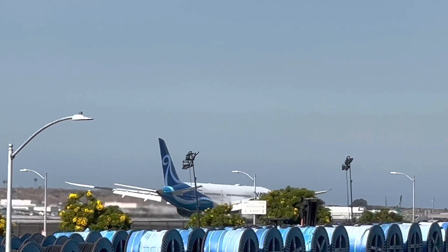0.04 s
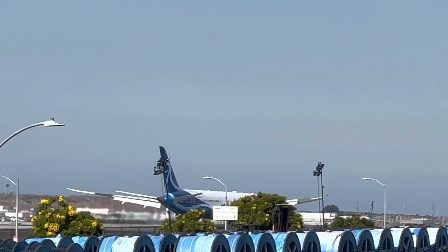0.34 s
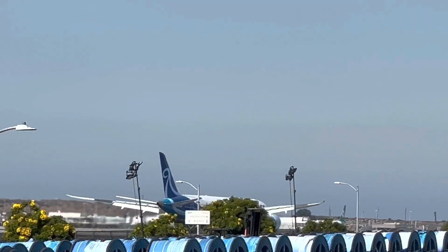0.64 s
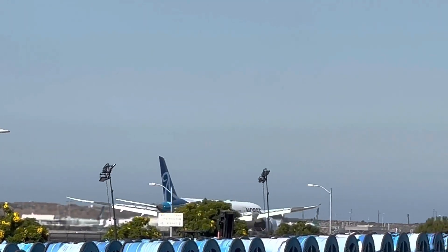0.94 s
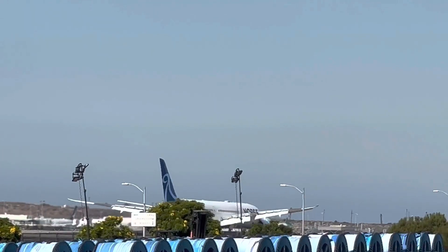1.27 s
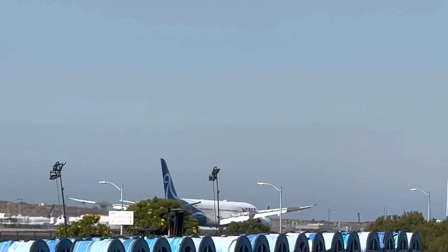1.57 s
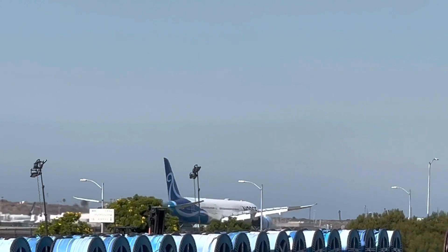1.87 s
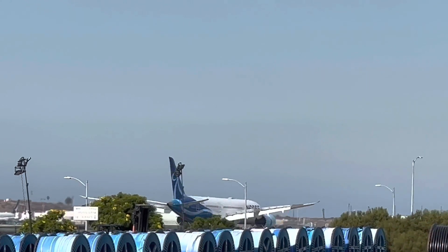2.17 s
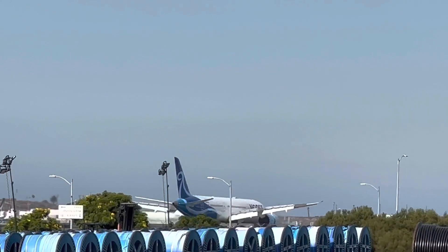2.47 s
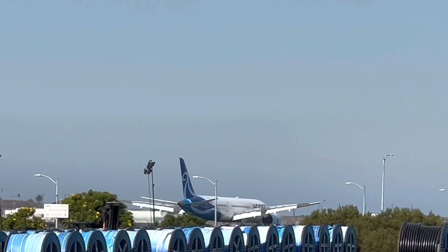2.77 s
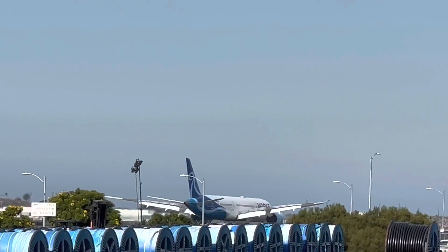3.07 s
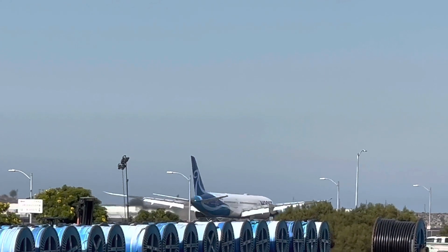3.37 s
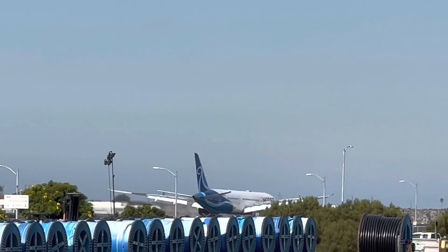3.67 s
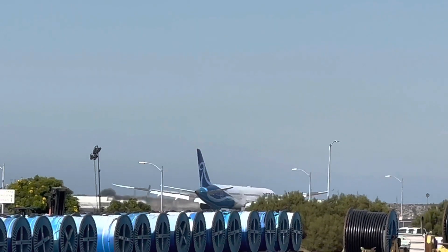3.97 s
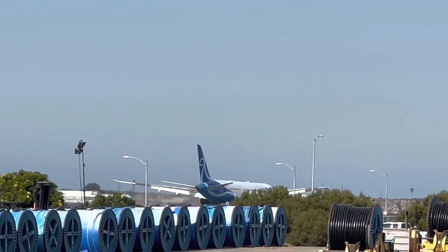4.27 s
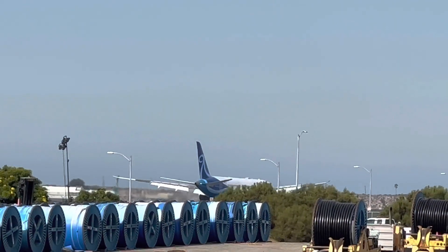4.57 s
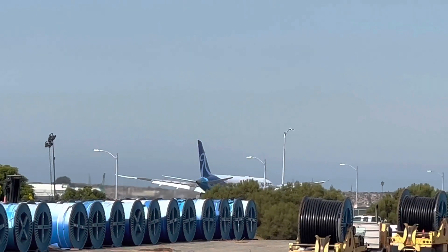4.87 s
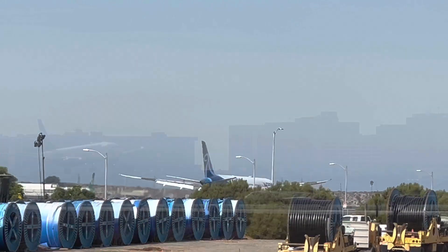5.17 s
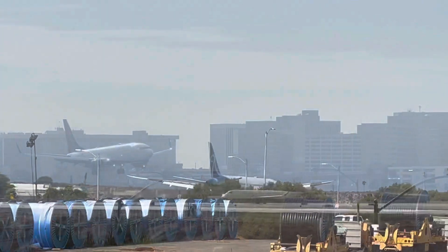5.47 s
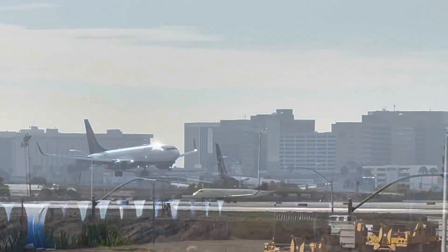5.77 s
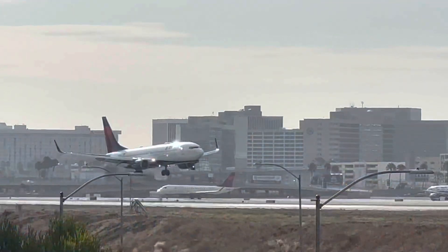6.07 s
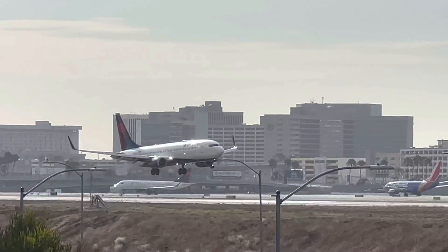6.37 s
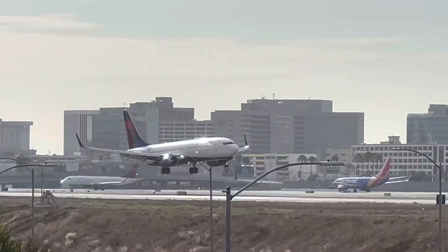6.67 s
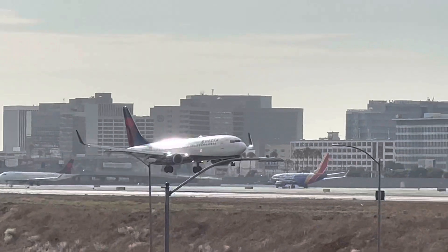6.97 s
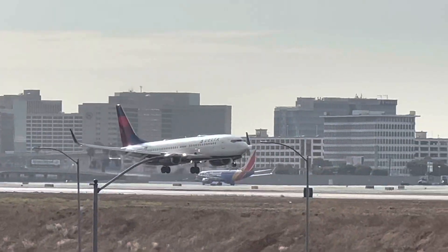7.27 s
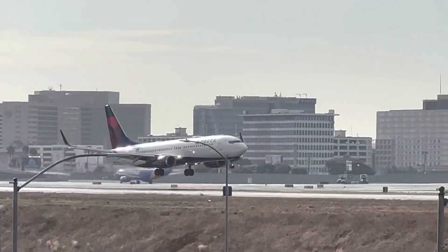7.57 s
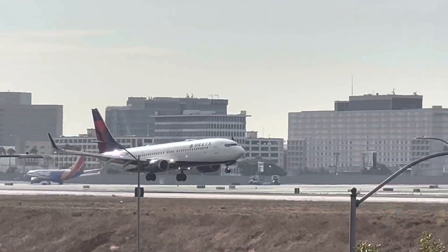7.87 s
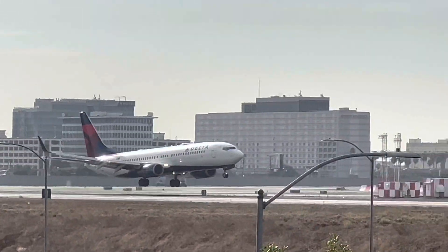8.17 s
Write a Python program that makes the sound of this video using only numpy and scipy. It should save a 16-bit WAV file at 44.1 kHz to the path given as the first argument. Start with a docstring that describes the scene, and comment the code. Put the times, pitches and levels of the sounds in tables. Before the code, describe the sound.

From the start, an airliner slows on a distant runway with a broad, steady roar, light hiss and deep rumble. A hollow, mid-pitched howl wavers in and out, strongest around 2.8 seconds. The rumble surges unevenly near 1.4 seconds, between 2.5 and 3.5, and again from 4.5 to 5.

Between about 5.2 and 6 seconds, this blends smoothly into a second jet gliding in to land. Its high, fluttering whine sinks in pitch, more quickly as it draws level. Its roar and hiss build from about 7.5 seconds until the sound ends at roughly 8.4. A thin, faint whistle of nearly steady pitch swells and fades alongside this second plane.

Close to the outdoor microphone, something dry rustles very softly, most noticeably around 2.5 to 4 seconds, with a few tiny ticks just after 6 seconds.

```python
"""A surging rumble, a broad roar and a hollow howl: an airliner rolls out on a distant runway, its
reverse thrust shedding turbulent eddies, the large ones rumbling and the small ones hissing.
The scene dissolves to a second jet gliding in to land, its fan and turbine whine sinking by the
Doppler effect as it draws level, while a thin whistle stands over the airfield. The echo from a
nearby hard surface comb-filters both jets, and something dry rustles close by."""
import sys
import numpy as np
from scipy import signal
from scipy.fft import rfft, irfft
from scipy.io import wavfile
from scipy.ndimage import uniform_filter1d

SR = 44100
rng = np.random.default_rng(int(sys.argv[2]) if len(sys.argv) > 2 else 0)


def inscribe(sig):
    """Save sig as 16-bit PCM at rate SR to the path in sys.argv[1].

    A 1-D sig is mono; a 2-D sig holds one channel per row.
    Samples are clipped to [-1, 1] before scaling.
    """
    pcm = np.round(np.clip(np.atleast_2d(sig).T, -1, 1) * 32767)
    wavfile.write(sys.argv[1], SR, pcm.astype(np.int16))


N = 371322
TIME = np.arange(N) / SR
FREQ = np.maximum(np.arange(N // 2 + 1) * SR / N, 1)


# Strength of the reverse thrust. Each row: time in seconds, relative level in dB.
THRUST = [(0, -28.5), (0.4, -29), (0.65, -30.5), (1.3, -30.5), (1.7, -32.5), (2.2, -31.5), (2.7, -29.0),
          (3.05, -30.0), (4.0, -31.0), (4.7, -31), (5.2, -32.5), (5.6, -32)]
# Spectrum of its roar and hiss. Each row: frequency in Hz, relative density in dB.
THRUST_SPECTRUM = [(400, -7), (700, 0.5), (850, -5), (1100, -3.5), (1550, -6.5), (2300, -13.5), (3000, -17),
                   (4000, -26.5), (5000, -34.5), (6300, -43.5), (8000, -52.5), (9500, -58)]

def rolling_jet():
    """Turbulent mixing: reversed fan air and exhaust roar; air absorbs the hiss as the jet recedes."""
    thrust_db, = curves(THRUST)
    spectrum = colour(THRUST_SPECTRUM)
    absorbed_db = 1.03 * TIME
    roar = lean(spread(spectrum * band(370, 3770), -19.5), right_db=.13)
    roar *= undb(thrust_db + 1.86 + .56 * walk(23))
    hiss = spread(spectrum * band(3190, 6350), -31)
    hiss *= undb(thrust_db - 12.5 - absorbed_db + .17 * walk(12))
    direct = exhaust_rumble() + roar + hiss + reverser_howl(thrust_db)
    return reflect(direct, left_share=.12, right_share=.3)


# Bass spectrum of the rolling jet. Each row: frequency in Hz, relative density in dB.
EXHAUST_SPECTRUM = [(10, -56.5), (20, -28.5), (30, -13), (42, -1.5), (54, 1.5), (75, -4), (96, -6),
                    (120, -10), (170, -10.5), (205, -12.5), (285, -10.5), (380, -13.5), (550, -15)]
# Slow course of its deep rumble and of its upper-bass boom. Each row: time in seconds, level in dB.
RUMBLE_LEVEL = [(0, -31.5), (0.55, -31), (1.4, -29.3), (2.05, -31.8), (2.65, -30.5), (3.2, -30),
                (3.8, -28.5), (4.6, -29.5), (5.3, -31.5)]
BOOM_LEVEL = [(0, -36), (0.5, -33.5), (1.1, -35.5), (1.38, -30.5), (1.85, -35.5), (3.1, -33.5), (3.9, -36),
              (5.1, -34.5), (5.5, -36)]

def exhaust_rumble():
    """Large eddies radiate low frequencies: a surging rumble and a boom under a nearly steady body."""
    rumble_db, = curves(RUMBLE_LEVEL)
    boom_db, = curves(BOOM_LEVEL)
    spectrum = colour(EXHAUST_SPECTRUM)
    rumble = spread(spectrum * band(26, 94), -27.5) * undb(rumble_db + eddy_surges(chance_db=.8))
    boom = spread(spectrum * band(94.5, 200), -20.5) * undb(boom_db)
    body = spread(spectrum * band(176, 510), -22.5) * undb(-31 + .5 * walk(7))
    return rumble + boom + body


# The strongest surges and lulls of both jets' rumble. Each row: centre in seconds, lift in dB.
EDDY_SURGES = [(1.3, 1.5), (1.46, 3), (2.46, 5.5), (2.67, 6), (2.81, 5.2), (3.14, 5.5), (3.48, 4),
               (3.68, -4), (4.48, 5), (4.76, 6), (4.95, 4.2), (5.33, 3), (6.36, 4), (6.47, -7), (7.63, 4),
               (7.8, -3.5)]

def eddy_surges(chance_db, width_s=.05):
    """Intermittency: the rumble's lift in dB as large eddies pass, with smaller random surges on top."""
    strongest_db = sum(db * np.exp(-((TIME - s) / width_s) ** 2) for s, db in EDDY_SURGES)
    return strongest_db + chance_db * walk(6)


# Howl of the reversers. Each row: time in seconds, pitch in Hz, relative level in dB.
REVERSER_HOWL = [(0, 654, -56), (0.35, 631, -33), (0.58, 633, -42), (0.66, 623, -26), (0.74, 640, -39),
                 (0.95, 632, -43), (1.1, 632, -34), (1.3, 642, -31), (1.42, 629, -30.5), (1.5, 626, -48.5),
                 (1.68, 622, -34), (2.0, 632, -45), (2.2, 628, -38), (2.62, 638.5, -43), (2.81, 640, -24),
                 (2.94, 638, -43), (3.1, 634, -33), (3.27, 636, -36.5), (3.52, 643, -30.5),
                 (3.64, 643, -46), (3.95, 647, -36), (4.25, 637, -33), (4.4, 635, -35), (4.56, 644.5, -30),
                 (4.72, 637, -42), (5.4, 634, -40)]

def reverser_howl(thrust_db, waver_hz=3):
    """Frequency modulation: turbulent flow shakes the howl, a narrow core on a wider skirt of noise."""
    hz, howl_db = curves(REVERSER_HOWL)
    hz = hz + waver_hz * walk(8.3)
    core = even(tone(hz, smear_hz=12), .038) * undb(howl_db - 2 + .98 * walk(42))
    skirt = tone(hz, smear_hz=34) * undb(thrust_db - 19.5)
    return core + skirt


# Spectrum of the landing jet's roar and hiss. Each row: frequency in Hz, relative density in dB.
GLIDE_SPECTRUM = [(400, -2.5), (700, 2.5), (850, 1.5), (1100, -0.5), (1550, -4), (2300, -7.5), (3000, -11),
                  (3800, -18.5), (4400, -21.5), (5100, -26), (6300, -32.5), (7300, -37.5), (8000, -46.5),
                  (9500, -65)]
# Broad peaks of its engines' blare. Each row: centre in Hz, width in Hz, relative height in dB.
BLARE_RESONANCES = [(1175, 260, 3), (1570, 290, -1)]
# Its treble wavers on the way through the air. Each row: time in seconds, gain in dB.
TREBLE_WAVER = [(5.8, 0), (6.15, 0.5), (6.55, -2), (6.78, 0), (7.1, -1), (7.5, 0), (8.0, -1.5),
                (8.42, -2.5)]

def landing_jet(speed_m_s=72, distance_m=72, abeam_s=8.27):
    """Directivity: noise of near-idle engines and air over the flaps grows as the jet turns side-on."""
    bearing = np.arctan2(distance_m, speed_m_s * (abeam_s - TIME))  # straight flight path
    nose_deg = np.degrees(bearing)
    ahead_deg = 90 - nose_deg
    exhaust_db = 7.5 * beam(nose_deg, aim_deg=107, width_deg=11.2)  # the exhaust comes into view
    treble_db, = curves(TREBLE_WAVER)
    spectrum = colour(GLIDE_SPECTRUM)
    roar = spread(spectrum * band(410, 3500), -9)
    roar *= undb(-36.5 - .05 * ahead_deg + exhaust_db + .46 * walk(12))
    blare = spread(peaks(BLARE_RESONANCES), -26) * undb(-39)
    blare *= beam(nose_deg, aim_deg=93.6, width_deg=17)
    hiss = spread(spectrum * band(3350, 7400), -34)
    hiss *= undb(-48 - .13 * ahead_deg + exhaust_db + .5 * walk(13))
    air = spread(spectrum * band(7100, 8400), -27.5) * undb(-83 + .8 * walk(12))
    lower = lean(glide_rumble() + roar + blare, right_db=.45)
    treble = (hiss + air) * undb(treble_db)
    return reflect(lower + treble + blade_whine(bearing, speed_m_s), left_share=-.02, right_share=.2)


# Bass spectrum of the landing jet. Each row: frequency in Hz, relative density in dB.
GLIDE_BASS_SPECTRUM = [(10, -54), (20, -25.5), (30, -16.5), (42, -14), (55, 0.5), (75, -4), (95, -6),
                       (160, -11.5), (205, -18), (260, -18), (380, -22), (460, -19), (550, -21.5)]
# Slow course of its rumble. Each row: time in seconds, level in dB.
GLIDE_RUMBLE_LEVEL = [(5.3, -28), (5.9, -31.5), (6.8, -29.5), (7.3, -31), (7.75, -32.5), (8.4, -29)]

def glide_rumble():
    """Large-scale turbulence: the landing jet's bass surges beneath a nearly steady body."""
    rumble_db, = curves(GLIDE_RUMBLE_LEVEL)
    spectrum = colour(GLIDE_BASS_SPECTRUM)
    rumble = spread(spectrum * band(25, 114), -14) * undb(rumble_db + eddy_surges(chance_db=.5))
    body = spread(spectrum * band(114.6, 480), -13) * undb(-36 + .7 * walk(6))
    return rumble + body


# Beamed tones of the fan, other blade rows and shaft orders. Each row: multiple of the fan tone,
# aim in degrees from the nose, half width in degrees, level on the beam's axis in dB.
BLADE_TONES = [(0.97, 52, 11, -55.5), (1.36, 79, 6, -59), (1.48, 55, 4, -62.5), (2, 35, 9, -74),
               (2, 53, 9, -64.5), (2, 66, 11, -66), (2, 94, 14, -69.5), (2.495, 53, 13, -76),
               (2.54, 94, 16, -68), (3.01, 101, 22, -72)]

def blade_whine(bearing, speed_m_s, fan_hz=2455, smear_hz=42, flutter_db=2.2):
    """Doppler effect: the tones sink as the jet draws level; moving air bends, smears and flutters them."""
    heard_hz = fan_hz / (1 - speed_m_s / 343 * np.cos(bearing))
    heard_hz *= 1 + .003 * walk(10)
    whine = np.zeros(N)
    for multiple, aim_deg, width_deg, db in BLADE_TONES:
        line = even(tone(multiple * heard_hz, multiple * smear_hz), .05)
        whine += line * beam(np.degrees(bearing), aim_deg, width_deg) * undb(db + flutter_db * walk(24))
    return whine


# The whistle over the airfield. Each row: time in seconds, pitch in Hz, level in dB.
AIRFIELD_WHISTLE = [(5.6, 3250, -58), (6.1, 3320, -60.5), (6.22, 3250, -55.5), (6.32, 3260, -63),
                    (6.5, 3300, -61), (6.76, 3320, -69), (6.87, 3285, -56), (7.0, 3290, -60),
                    (7.4, 3295, -63), (7.62, 3305, -55.5), (7.77, 3300, -61), (7.92, 3270, -56),
                    (8.22, 3294, -56), (8.42, 3300, -63)]

def airfield_whistle():
    """Amplitude modulation: a thin line of nearly steady pitch swells and fades."""
    hz, whistle_db = curves(AIRFIELD_WHISTLE)
    return even(tone(hz, smear_hz=8), .082) * undb(whistle_db + .5 * walk(4))


# Course of the nearby rustle. Each row: time in seconds, level in dB.
RUSTLE_LEVEL = [(0, -84), (1.1, -79.5), (2.35, -74), (2.52, -70.5), (3.0, -69.5), (3.23, -67), (3.4, -74),
                (3.63, -75), (3.7, -69.5), (3.86, -73), (4.01, -72), (4.12, -77), (5.2, -78.5), (5.55, -73),
                (6.0, -77), (6.52, -83), (6.75, -74), (7.2, -79), (7.5, -83), (8.42, -90)]
# Spectrum of its grains. Each row: frequency in Hz, relative density in dB.
GRAIN_SPECTRUM = [(1500, -30.5), (4500, -0.5), (7000, 3), (8500, -5), (9800, -14), (11500, -25)]
# Soft ticks within it. Each row: start in seconds, level in dB.
RUSTLE_TICKS = [(6.062, -70), (6.171, -54), (6.202, -66), (6.401, -69)]

def rustle(grains_per_s=6000, scatter_db=3.5, bunch_db=1.3, tick_decay_s=.004):
    """Shot noise: something dry stirs in bunches of tiny random impulses, with a few decaying ticks."""
    rustle_db, = curves(RUSTLE_LEVEL)
    grains = (rng.random(N) < grains_per_s / SR) * rng.choice([-1, 1], N)
    grains = grains * undb(scatter_db * rng.standard_normal(N))
    grit = irfft(rfft(grains) * colour(GRAIN_SPECTRUM), N)
    grit = grit / grit.std() * undb(rustle_db + bunch_db * walk(22))
    ticks = sum(undb(db) * (TIME > s) * np.exp(-np.abs(TIME - s) / tick_decay_s) for s, db in RUSTLE_TICKS)
    return grit + noise(band(3800, 7000)) * ticks


def reflect(x, left_share, right_share):
    """Comb filtering: one echo off a nearby hard surface interferes with the direct sound at each ear."""
    lag_s = np.array([[.001906], [.001945]])
    echo = np.array([[left_share], [right_share]]) * np.exp(-2j * np.pi * FREQ * lag_s)
    # the surface is too small for long waves and too rough for short ones
    reflectance = 1 / (1 + (600 / FREQ) ** 2) / (1 + (FREQ / 3000) ** 8)
    return irfft(rfft(x) * (1 + echo * reflectance), N)


def spread(gain, side_db):
    """Scattering: direct noise in the middle, plus a weaker part of opposite sign left and right."""
    side = undb(side_db) * noise(gain)
    return even(noise(gain), .15) + np.array([side, -side])


def lean(x, right_db):
    """Interaural level difference: the sound is a little louder on the right."""
    return x * undb(right_db * np.array([[-.5], [.5]]))


def beam(angle_deg, aim_deg, width_deg):
    """Directivity: gain of a Gaussian lobe aimed at some angle from the nose."""
    return np.exp(-((angle_deg - aim_deg) / width_deg) ** 2)


def tone(hz, smear_hz):
    """Spectral broadening: a line is smeared by the turbulent air it crosses."""
    phase = 2 * np.pi * np.cumsum(hz) / SR
    return (walk(smear_hz) * np.cos(phase) + walk(smear_hz) * np.sin(phase)) / np.sqrt(2)


def noise(gain):
    """Spectral shaping: white noise filtered by a gain per frequency, rms 1."""
    x = irfft(rfft(rng.standard_normal(N)) * gain, N)
    return x / x.std()


def walk(rate_hz):
    """Random fluctuation: low-passed noise, standard deviation 1."""
    return noise(np.exp(-(FREQ / rate_hz) ** 2))


def even(x, seconds):
    """Envelope normalisation: dividing by the running rms takes out slow swells."""
    return x / np.sqrt(uniform_filter1d(x ** 2, int(seconds * SR)) + 1e-9)


def peaks(rows):
    """Resonance: gain per frequency of summed Lorentzian peaks."""
    return sum(undb(db) / (1 + ((FREQ - hz) / (width / 2)) ** 2) for hz, width, db in rows)


def band(lo_hz, hi_hz):
    """Band-pass gain with steep, power-complementary edges."""
    return ((1 + (lo_hz / FREQ) ** 12) * (1 + (FREQ / hi_hz) ** 12)) ** -.5


def colour(points):
    """Spectral envelope: gain per frequency through (Hz, dB) points."""
    hz, db = np.transpose(points)
    return undb(np.interp(np.log(FREQ), np.log(hz), db))


def curves(rows):
    """Linear interpolation of a table's columns over time."""
    seconds, *columns = np.transpose(rows)
    return [np.interp(TIME, seconds, column) for column in columns]


def undb(db):
    """Decibels to amplitude ratio."""
    return 10 ** (np.asarray(db) / 20)


def scene(dissolve_s=(5.15, 6.05)):
    """Superposition: the first jet crossfades into the second and the whistle; the rustle runs on."""
    blend = np.interp(TIME, dissolve_s, [0, 1])
    return (1 - blend) * rolling_jet() + blend * (landing_jet() + airfield_whistle()) + rustle()


def record(dry, top_hz=11500):
    """Coherence: two microphone ports sound alike in one narrow band and part in phase just above it."""
    spectrum = rfft(dry)
    mid = spectrum.mean(axis=0)
    width = 1.05 - .6 * np.exp(-((FREQ - 2580) / 250) ** 4)
    skew_rad = .6 / (1 + ((FREQ - 3530) / 690) ** 20) * np.array([[.5], [-.5]])
    heard = irfft(mid + width * (spectrum * np.exp(1j * skew_rad) - mid), N)
    ease = np.minimum(1, np.minimum(TIME, TIME[::-1]) / .004)  # 4 ms fade at each end
    lowpass = signal.ellip(8, .2, 70, top_hz, fs=SR, output="sos")
    return signal.sosfilt(lowpass, heard * ease)


dry = scene()
out = record(dry)
inscribe(out)
```